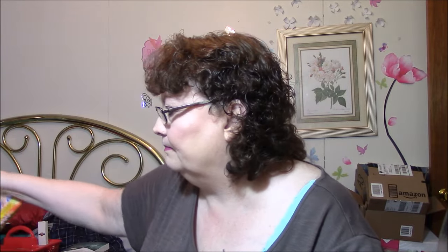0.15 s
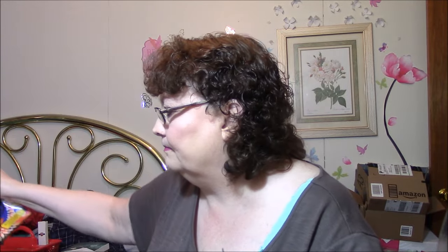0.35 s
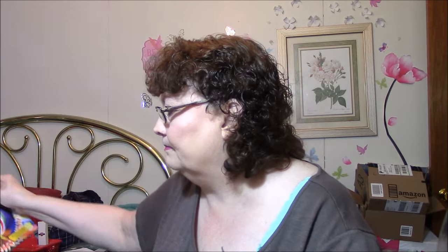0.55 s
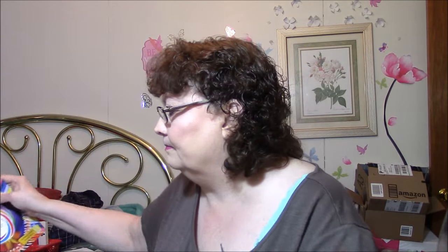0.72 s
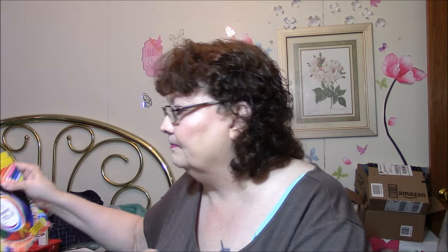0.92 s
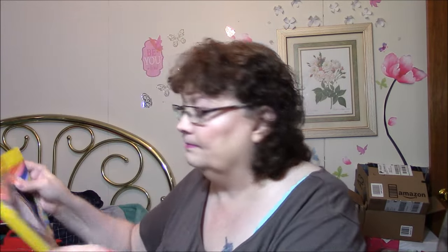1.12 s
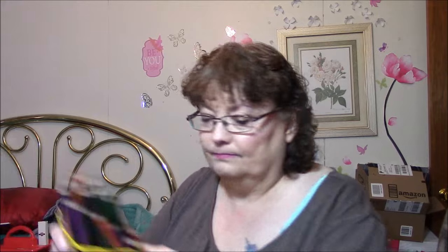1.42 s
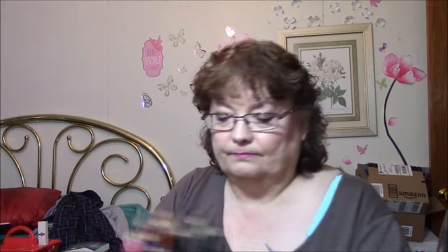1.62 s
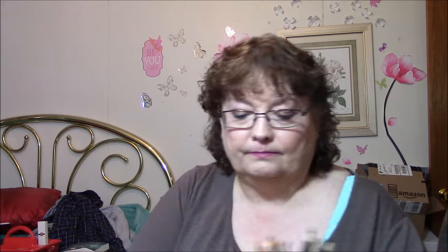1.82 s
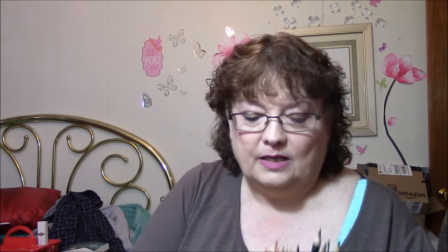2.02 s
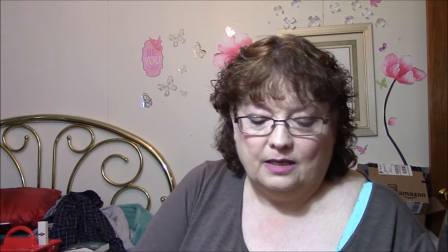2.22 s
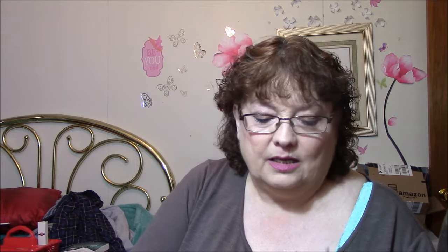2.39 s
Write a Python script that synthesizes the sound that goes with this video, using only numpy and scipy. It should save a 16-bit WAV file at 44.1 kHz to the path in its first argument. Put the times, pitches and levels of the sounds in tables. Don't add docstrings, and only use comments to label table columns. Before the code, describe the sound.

Close up, light pencil clicks and rubbing fade to a quiet pause; film ticks and loose wooden taps follow, building to a dense, hard rattle, with faint camera hiss and motor whine in a small furnished room.

```python
import sys
import numpy as np
from scipy import signal
from scipy.fft import rfft, irfft, next_fast_len
from scipy.io import wavfile
from scipy.ndimage import uniform_filter1d, map_coordinates

SR = 44100
rng = np.random.default_rng(int(sys.argv[2]) if len(sys.argv) > 2 else 0)


def decibels_to_gain(level_db):
    exponent = np.asarray(level_db, float) / 20
    return 10 ** exponent


def transcribe(u):
    v = np.clip(np.atleast_2d(u).T, -1, 1)
    q = np.round(v * 32767).astype(np.int16)
    wavfile.write(sys.argv[1], SR, q)


N = 112454

# mode_hz, level_db, t60_s
WOOD = [(227, -20.5, 0.062), (317, -4.5, 0.02), (420.5, -7, 0.032), (873, -15, 0.039), (1380, -2.5, 0.02),
        (1700, -12.5, 0.039), (2520, -3, 0.012), (3700, -14, 0.011), (4615, -22, 0.024),
        (6700, -12.5, 0.0099), (9360, -43.5, 0.0073)]
LENGTH_SPREAD = 0.06
CRACK_S = 0.0035


def unit(x):
    return x / np.sqrt(np.mean(x ** 2) + 1e-20)


def along(points, hz):
    f, v = np.transpose(points)
    return np.interp(np.log(hz + 1), np.log(f + 1), v)


def filtered(x, response):
    m = next_fast_len(N + 8192)
    return irfft(rfft(x, m) * response(np.fft.rfftfreq(m, 1 / SR)), m)[..., :N]


def ring(x, hz, t60):
    r = decibels_to_gain(-60 / (max(t60, .0002) * SR))
    w = 2 * np.pi * hz / SR
    return signal.lfilter([0, np.sin(w)], [1, -2 * r * np.cos(w), r * r], x)


def wobble(rate):
    knots = rng.standard_normal(int(N * rate / SR) + 4)
    return map_coordinates(knots, [np.arange(N) * rate / SR])


def train(s, size):
    return np.bincount(np.clip(np.round(s * SR).astype(int), 0, N - 1), size, N)


def hiss():
    # pitch_hz, level_db per Hz
    spectrum = [(12, -78), (20, -43.5), (124, -6), (331, -12.5), (548, -15), (706, -16.5), (2570, -27.5),
                (5630, -32), (16400, -45.5)]
    # pitch_hz, correlation (0 to 1)
    likeness = [(60, 1), (380, 0.55), (2380, 0.55), (15000, 0.9)]

    def mid_side(hz):
        turn = np.arccos(np.clip(along(likeness, hz), -1, 1)) / 2
        return decibels_to_gain(along(spectrum, hz)) * [np.cos(turn), np.sin(turn)]

    mid, side = filtered(rng.standard_normal((2, N)), mid_side)
    return decibels_to_gain(-52.5 + 0.18 * wobble(6.0)) * unit(np.array([mid + side, mid - side]))


def focus_motor():
    # first_step, length_steps, level_db
    bursts = [
        (0, 1.05, -66.5),
        (1.15, 1, -70.5),
        (2.9, .55, -69),
        (3.7, .35, -68),
        (5, 0.93, -63.5),
        (7, 1, -65.5),
        (9, 1, -65),
        (11, 1.1, -71.5),
        (13, 2.2, -70),
        (16, 1, -66.5),
    ]
    start_s, step_s, whine_hz = .252, .0667, 5562
    t = np.arange(N) / SR
    step = (t - start_s) / step_s
    on = sum(decibels_to_gain(db + 3.5) * (step > first) * (step < first + steps) for first, steps, db in bursts)
    level = uniform_filter1d(on, size=250) * decibels_to_gain(1.5 * wobble(60))
    return level * np.sin(2 * np.pi * whine_hz * t)


def room(x):
    # pitch_hz, t60_s
    decay = [(200, 0.3), (2000, 0.084), (10000, 0.12)]
    # pitch_hz, level_db
    side_colour = [(100, -58), (500, -9.5), (1400, -16.5), (4000, 3.5), (8000, -3), (15000, 0)]
    side_db = -9
    out = np.zeros((2, N))
    part = np.arange(N) // (SR // 4)
    for k in range(part.max() + 1):
        hz, t, z = signal.stft(rng.standard_normal((2, SR // 2)), SR, nperseg=256)
        fade = decibels_to_gain(-60 * t / along(decay, hz)[:, None])
        tail = signal.istft(z * fade, SR, nperseg=256)[1]
        tail = tail / np.linalg.norm(tail[0])
        late = np.pad(x * (part == k), (130, 0))[None]
        out = out + signal.fftconvolve(late, tail, axes=1)[:, :N]
    side = decibels_to_gain(side_db) * filtered(out[1], lambda hz: decibels_to_gain(along(side_colour, hz)))
    return np.array([out[0] + side, out[0] - side])


def thud():
    # start_s, peak_db
    bumps = [
        (1.223, -28.5),
    ]
    # mode_hz, level_db, t60_s
    modes = [(310, 11.5, .06), (200, -6, 0.063), (422, 6.5, 0.035), (564, -4, 0.082)]
    s, db = np.transpose(bumps)
    push = signal.fftconvolve(train(s, decibels_to_gain(db - 39.5)), np.hanning(70))[:N]
    return sum(decibels_to_gain(level) * ring(push, hz, t60) for hz, level, t60 in modes)


def ticks():
    # start_s, peak_db, centre_hz
    snaps = [(.13, -33.5, 7100), (.625, -45, 8650), (0.776, -45, 5070), (1.372, -37.5, 5900),
             (1.386, -51, 9000), (1.397, -49, 6300), (1.421, -25.5, 7300), (1.447, -26, 9850),
             (1.451, -18.5, 7060), (1.459, -23.5, 6800), (1.473, -33, 6600), (1.524, -42.5, 11000),
             (1.534, -36.5, 11400), (1.538, -32.5, 6560), (1.602, -20, 10150), (1.609, -42, 10300),
             (1.728, -26.5, 6400), (1.787, -34, 5030), (2.027, -24, 5400), (2.09, -17.5, 5700),
             (2.215, -31, 7300), (2.258, -16, 5770), (2.262, -18.5, 6430), (2.284, -19.5, 6960),
             (2.385, -41.5, 6400)]
    tick_s, tick_db, relative_width = 0.0021, 3, .33
    out = np.zeros(N + SR)
    t = np.arange(SR // 30) / SR
    for s, peak_db, hz in snaps:
        burst = np.diff(rng.standard_normal(len(t) + 1)) * decibels_to_gain(-20 * t / tick_s)
        tick = ring(burst, hz, np.log(1000) / (np.pi * hz * relative_width / 2))
        out[round(s * SR):][:len(t)] += decibels_to_gain(peak_db + tick_db) * tick / np.abs(tick).max()
    return out[:N]


def rub_colour(hz):
    # pitch_hz, level_db per Hz
    slide_spectrum = [(88, -45), (150, -40), (376, 1.5), (1120, 0.5), (1340, -23), (2020, -1), (2450, -5.5),
                      (6640, -13), (16000, -26.5)]
    ring_gain, log_width = 1.2, .08
    rises = sum(np.exp(-(np.log((hz + 1) / f) / log_width) ** 2) for f, _, _ in WOOD)
    return decibels_to_gain(along(slide_spectrum, hz)) * (1 + ring_gain * rises)


def crack(blows, t60):
    # pitch_hz, level_db
    click = [(200, 12.5), (1500, 28.5), (6000, 10.5), (16000, -26)]
    fade = signal.lfilter([1], [1, -decibels_to_gain(-60 / (max(t60, .0005) * SR))], blows)
    return filtered(fade * rng.standard_normal(N), lambda hz: decibels_to_gain(along(click, hz)))


def touch(hz, db, phase, longer=1):
    rise_s = .0008
    t = np.arange(SR // 5) / SR
    t60 = along([(f, d) for f, _, d in WOOD], hz) * longer
    swell = 1 - np.exp(-t / rise_s)
    return (decibels_to_gain(db - 60 * t / t60) * swell * np.sin(2 * np.pi * hz * t + phase)).sum(0)


def tinks():
    # start_s, peak_db, mode_hz
    tips = [(0.028, -24, 2900), (.066, -24, 2560), (.129, -30, 3020), (.144, -28, 3140), (0.174, -33, 3200),
            (.189, -24, 2640), (.297, -40, 602), (.305, -44, 3250), (.396, -40.5, 2650), (.487, -47, 1730),
            (.762, -47, 2380), (.769, -40.5, 2620), (0.802, -45, 1070), (1.395, -36.5, 4200),
            (1.46, -26.5, 2980), (1.572, -26.5, 2470), (1.929, -33, 2540), (2.031, -26, 2570),
            (2.09, -9, 2520), (2.092, -23, 880), (2.155, -8.5, 2630), (2.261, -11, 3700),
            (2.284, -14.5, 3490), (2.5, -27, 490), (2.269, -11.5, 2690), (2.076, -13.5, 2470),
            (1.756, -30, 2500), (.9, -47, 2940), (1.572, -24, 6800), (1.572, -33, 4500), (1.633, -28, 6500),
            (1.73, -28.5, 4050), (1.888, -29, 6200), (2.114, -13.5, 6700), (2.398, -37, 3820),
            (2.484, -39, 3620)]
    out = np.zeros(N + SR)
    for s, peak_db, hz in tips:
        out[round(s * SR):][:SR // 5] += touch(hz * np.array([[.99], [1.015]]), peak_db - 1, 0)
    return out[:N]


def rattle(count=10):
    # start_s, effort_db, brightness (1.72 dB of treble shelf above about 3 kHz per unit),
    # wood_over_rubbing_db
    lift = [
        (0, -33.5, 0.5, -1.5),
        (.03, -31, -4, -4),
        (0.071, -28, -2, -5),
        (.112, -41, 1.5, -3),
        (.138, -35, 3.5, -5.5),
        (0.165, -39.5, -2.5, 0),
        (0.189, -32, -0.5, -2),
        (.27, -53.5, -3, -1.5),
    ]
    # start_s, effort_db, brightness (1.72 dB of treble shelf above about 3 kHz per unit),
    # wood_over_rubbing_db
    carry = [
        (.48, -49, -4.5, -3.5),
        (.66, -59, -3, -6.5),
        (.764, -62, -13, -8),
        (0.77, -41.5, -1, -6),
        (.86, -50.5, -14, -7),
        (.95, -66, -3, -16),
        (1.35, -62.5, 0, 2),
    ]
    # start_s, effort_db, brightness (1.72 dB of treble shelf above about 3 kHz per unit),
    # wood_over_rubbing_db
    tip = [
        (1.365, -53.5, 2, -4),
        (1.384, -35.5, -2, -8.5),
        (1.55, -43, 1.5, 0),
        (1.693, -50, 5, 3),
        (1.723, -35.5, 2.5, -2.5),
        (1.848, -39, 3, 2),
        (1.9, -39.5, 4.5, -12.5),
        (1.97, -39, 5, -0.5),
        (2.03, -35, 5.5, -1.5),
    ]
    # start_s, effort_db, brightness (1.72 dB of treble shelf above about 3 kHz per unit),
    # wood_over_rubbing_db
    sort = [
        (2.06, -38.5, 9, -2.5),
        (2.12, -30.5, 4.5, 0),
        (2.18, -25.5, 3, 1),
        (2.25, -31.5, 4, 4),
        (2.328, -27.5, -0.5, 2),
        (2.369, -43, -4, 1.5),
        (2.427, -44, 1, -4),
        (2.469, -38.5, 3.5, 0.5),
        (2.55, -32, 2.5, 2.5),
    ]
    contacts_per_s, size_db, rarest = 1400, 3, .15
    mode_scatter_db, rub_uneven_db = 3.5, 2
    crack_db, slide_db, rattle_db = -17, -8, -1
    s, level_db, tilt, wood_db = np.transpose(lift + carry + tip + sort)
    draws = rng.random((4400, 3))
    at = np.cumsum(-np.log(draws[:, 0] + 1e-9)) / contacts_per_s - .002
    size = decibels_to_gain(-size_db * np.log(np.maximum(draws[:, 1], rarest))) * (at < N / SR)
    owner = (draws[:, 2] * count).astype(int)
    spread = np.linspace(-1, 1, count)[:, None] + 0.29 * rng.standard_normal((count, len(WOOD)))
    scale = 1 + LENGTH_SPREAD * spread
    shape = (len(WOOD), len(at))
    levels = decibels_to_gain(mode_scatter_db * rng.standard_normal(shape)) * rng.choice([-1, 1], shape)
    t = np.arange(N) / SR
    wood = np.zeros(N)
    for p in range(count):
        mine = size * (owner == p)
        for k, (hz, db, t60) in enumerate(WOOD):
            wood = wood + ring(train(at, mine * decibels_to_gain(db) * levels[k]), hz * scale[p, k], t60)
    wood = unit(wood + decibels_to_gain(crack_db) * crack(train(at, size), CRACK_S))
    wood = wood * decibels_to_gain(rattle_db + np.interp(t, s, wood_db))
    slide = unit(filtered(rng.standard_normal(N), rub_colour)) * decibels_to_gain(rub_uneven_db * wobble(90))
    both = wood + decibels_to_gain(slide_db) * slide
    high = filtered(both, lambda hz: 1j * hz / (3000 + 1j * hz))
    bright = both - high + high * decibels_to_gain(1.72 * np.interp(t, s, tilt))
    return decibels_to_gain(np.interp(t, s, level_db)) * bright


def clacks(count=2):
    # start_s, peak_db, brightness_db per octave, loudest_mode_hz
    clear = [(.021, -21, 0, 985), (0.061, -22, 8, 980), (.075, -26, 5.5, 1173), (.13, -28, -2, 937),
             (0.186, -25.5, 7, 898), (.192, -22, -2, 1550), (0.3, -33.5, -9, 886), (1.372, -36, -4, 1503),
             (1.395, -37, 8, 1020), (1.412, -34, -3, 1150), (1.449, -31, 5, 906), (1.538, -31.5, 7, 846),
             (1.571, -26.5, 4, 864), (1.458, -25, 9.5, 967), (1.464, -27, -1, 996), (1.624, -19, 4, 2300),
             (1.63, -19, 1, 2160), (1.647, -25, 2, 920), (1.713, -24, -2, 890), (1.74, -17.5, 0, 1250),
             (1.787, -19, 5.5, 2280), (1.835, -19, -10, 1230), (1.842, -18.5, -4, 1280),
             (1.862, -27, -11, 1260), (1.776, -19, -1, 1500), (1.93, -23, -5, 388), (1.96, -23.5, 8, 1365),
             (1.978, -27.5, 9, 1340), (1.993, -22, 1, 1350), (2.012, -19.5, -6, 518),
             (2.017, -17, -1, 1520)]
    # start_s, peak_db, brightness_db per octave, loudest_mode_hz
    falls = [(2.059, -24, -2, 1470), (2.069, -5.5, -6, 2490), (2.073, -11.5, 6, 1540),
             (2.077, -4.5, 0, 1615), (2.085, -12, -2, 1320), (2.09, 3, -1.5, 1374),
             (2.105, -13.5, -3, 1390), (2.115, -10, -1, 2400), (2.124, -14, 0, 1460),
             (2.153, -8.5, 8.5, 1310), (2.156, 0.5, 3.5, 2700), (2.165, -5, 3, 1440), (2.173, -11, 0, 1360),
             (2.184, -7.5, 6, 1353), (2.202, -7, 5, 1560), (2.206, -5.5, 0, 1700), (2.222, -14, 0, 1480),
             (2.233, -14, -2, 1300), (2.243, -13, 0, 1480), (2.258, -6, 6, 1440), (2.262, 0, 3.5, 1380),
             (2.27, 5, -1.5, 1342), (2.275, -6, 1.5, 1275), (2.284, -0.5, 0.5, 1494), (2.294, -7, 1, 1390),
             (2.325, -11, -4, 1400), (2.484, -17, 2, 1430), (2.503, -15.5, 1, 896)]
    chatter_s, rebound_db = .003, 8.5
    clack_db, other_modes_db, clack_crack_db = -8.5, -4.5, -24.5
    bass_loss_db = 2.5
    loose_ring, heaped_s = 1.6, 2.05
    out = np.zeros(N + SR)
    hz, db, _ = np.transpose(WOOD)[:, :, None]
    scattered = np.append(np.ones(len(hz)), 0)[:, None]
    for s, peak_db, tilt, main_hz in clear + falls:
        slope = np.where(hz > 1400, tilt, bass_loss_db)
        others = db + other_modes_db + slope * np.log2(hz / 1400)
        longer = loose_ring if s < heaped_s else 1
        for k in range(count):
            late = rng.random()
            pitch, level, phase = rng.standard_normal((3, len(hz) + 1, 1))
            f = np.vstack([hz, [[main_hz]]]) * (1 + LENGTH_SPREAD / 2 * pitch)
            g = np.vstack([others, [[0]]]) + 2.6 * level * scattered - rebound_db * k
            start = round((s + chatter_s * late * k) * SR)
            out[start:][:SR // 5] += touch(f, g + peak_db + clack_db, 3 * phase, longer)
    s, peak_db, tilt, _ = np.transpose(clear + falls)
    return out[:N] + crack(train(s, decibels_to_gain(peak_db + clack_crack_db + tilt)), CRACK_S)


def scene():
    low_cut_hz, curtain_hz, room_db = 143, 7000, -7
    near = rattle() + clacks() + tinks() + ticks() + thud()
    near = filtered(near, lambda hz: (1j * hz / (low_cut_hz + 1j * hz)) ** 3)
    soft = filtered(near, lambda hz: 1 / (1 + 1j * hz / curtain_hz))
    return near + decibels_to_gain(room_db) * room(soft) + hiss() + focus_motor()


def roll_off(x):
    return signal.sosfilt(signal.butter(12, 16510, fs=SR, output="sos"), x)


def record(dry):
    peak, knee, top_hz, top_order = .95, 5, 15300, 40
    held = dry / (1 + np.abs(dry / peak) ** knee) ** (1 / knee)
    mix = filtered(held, lambda hz: 1 / (1 + (hz / top_hz) ** top_order))
    return roll_off(mix)


dry = scene()
out = record(dry)
transcribe(out)
```